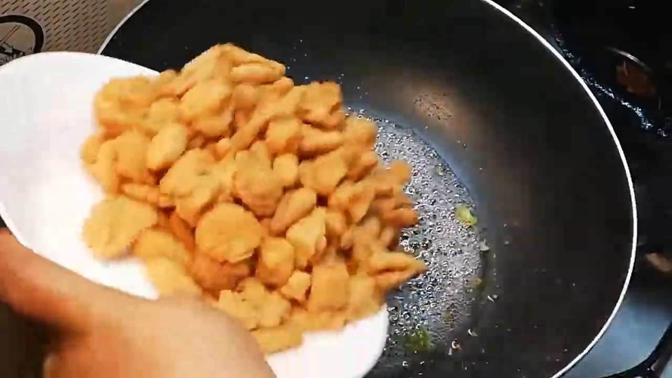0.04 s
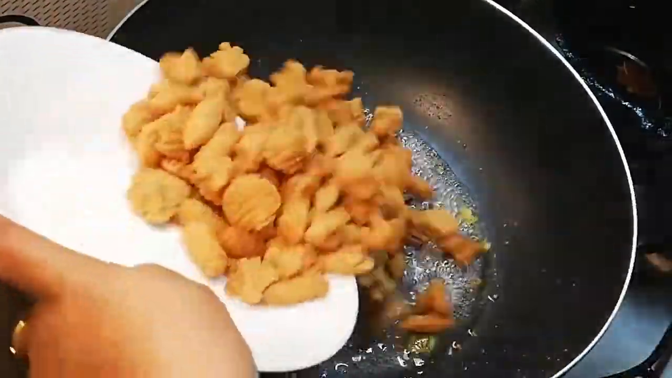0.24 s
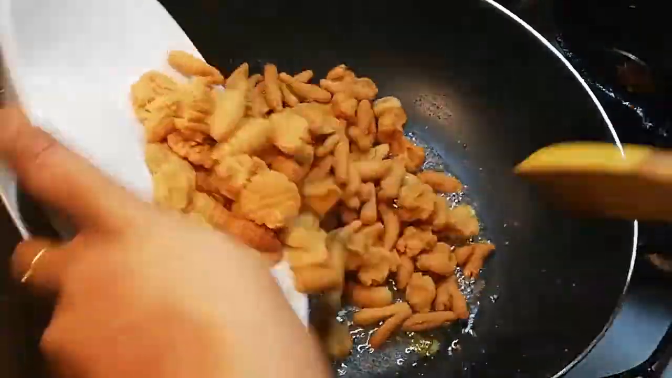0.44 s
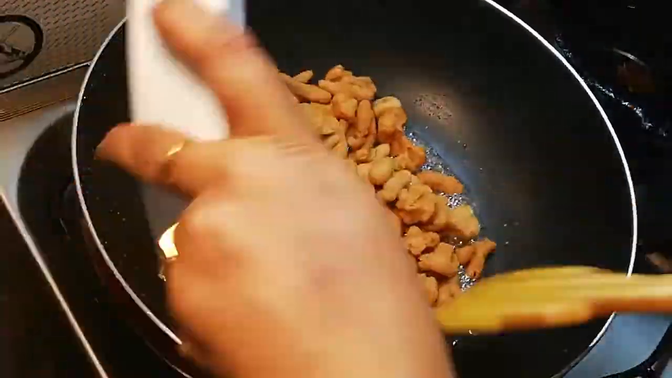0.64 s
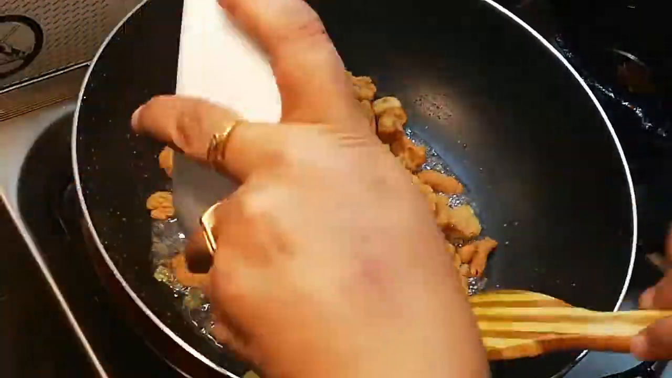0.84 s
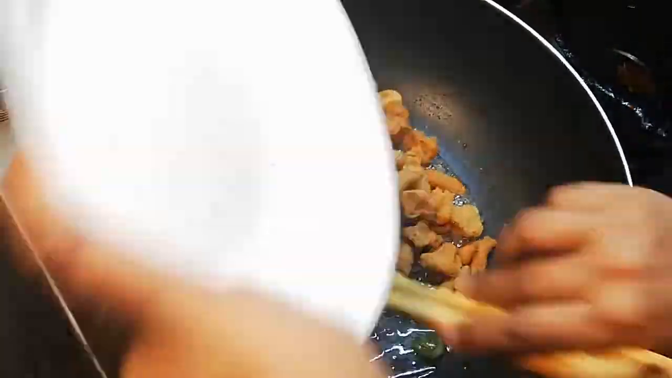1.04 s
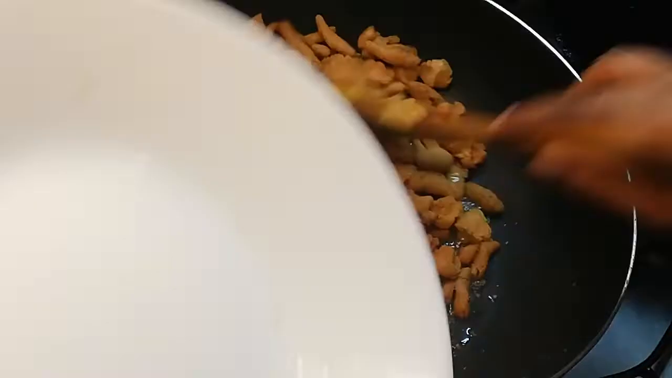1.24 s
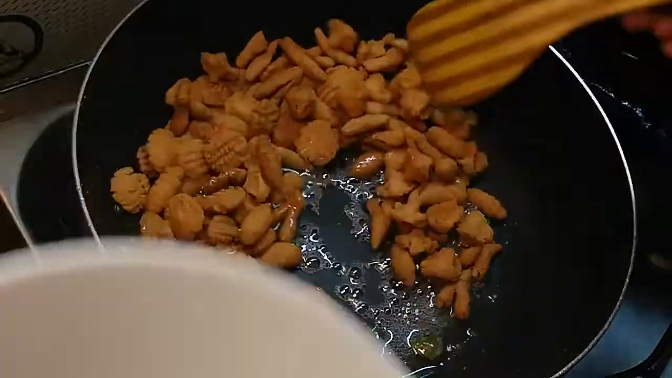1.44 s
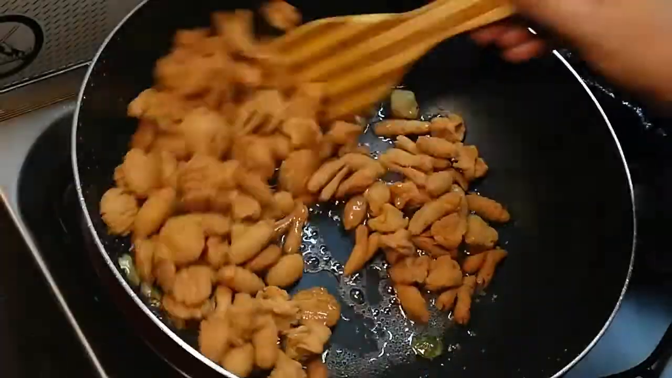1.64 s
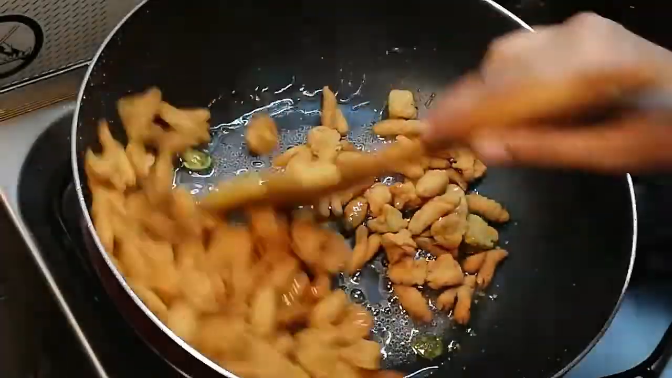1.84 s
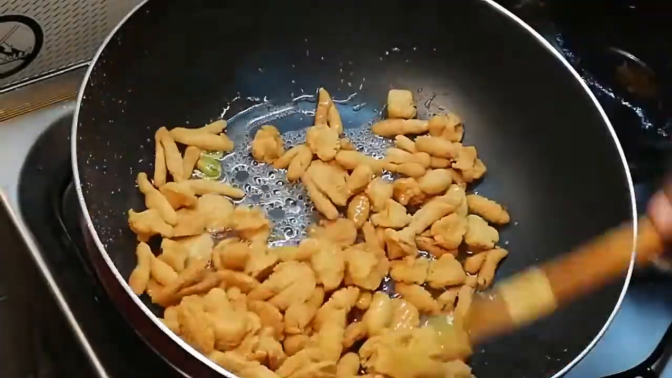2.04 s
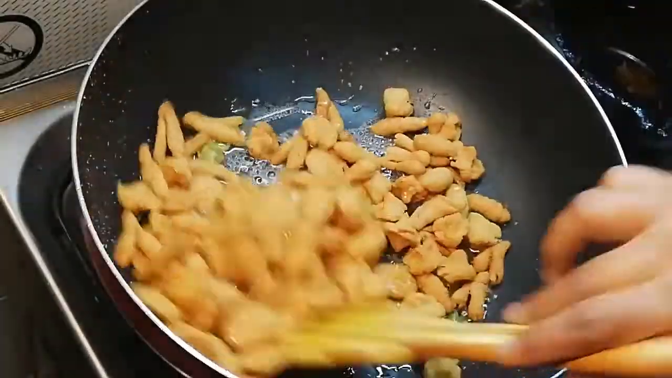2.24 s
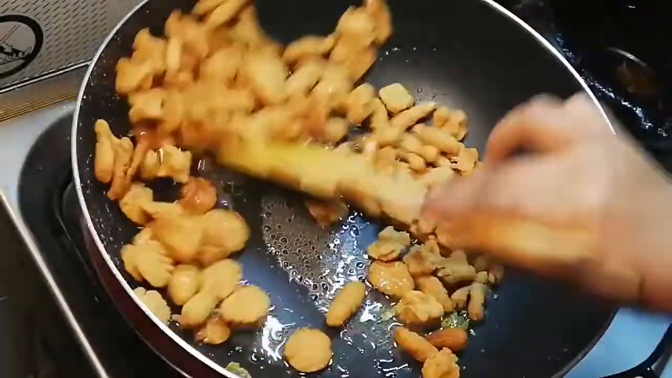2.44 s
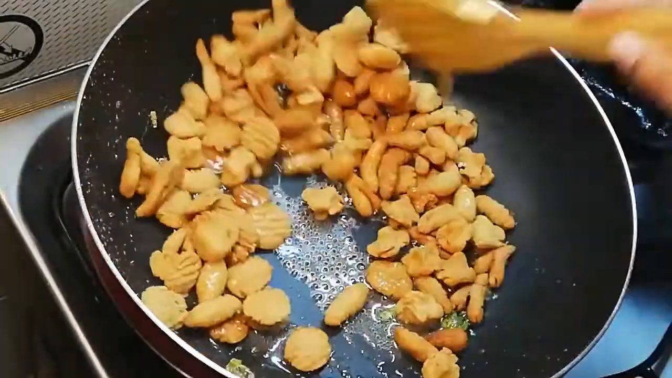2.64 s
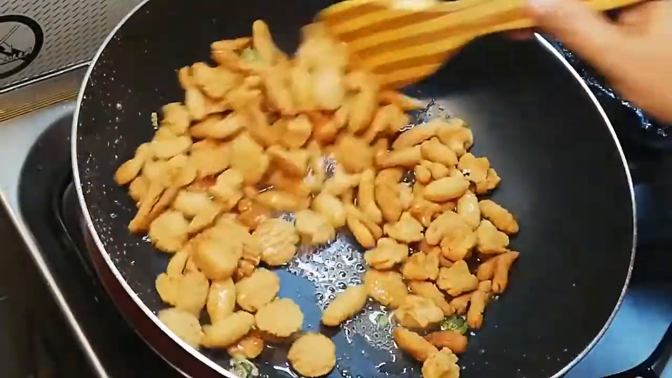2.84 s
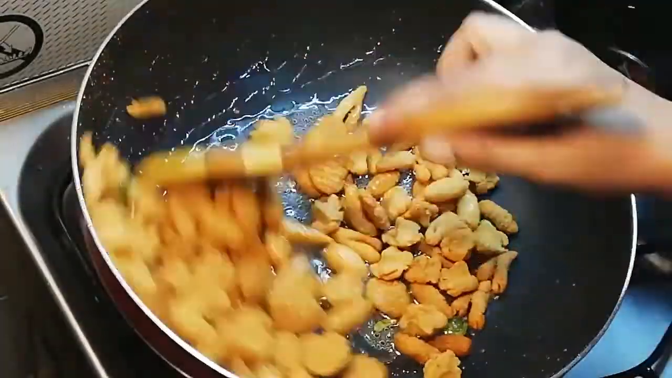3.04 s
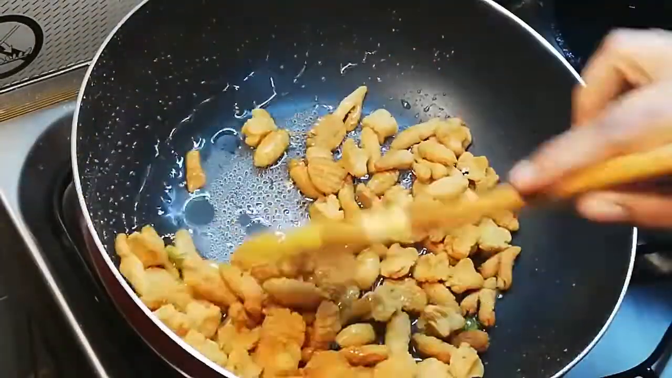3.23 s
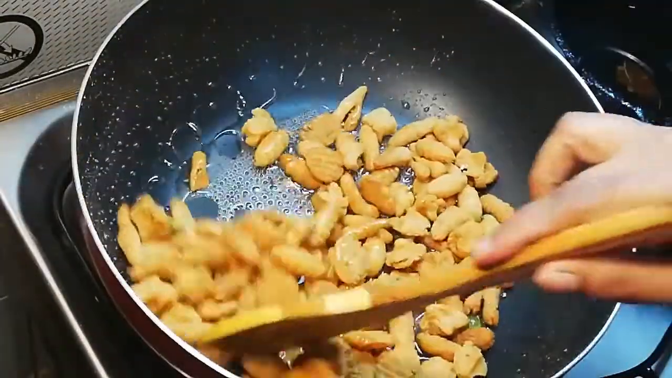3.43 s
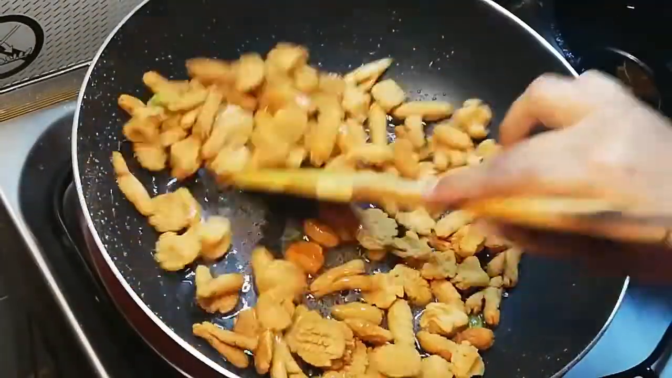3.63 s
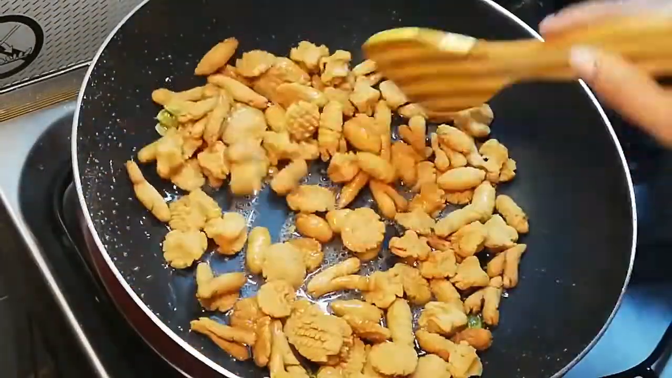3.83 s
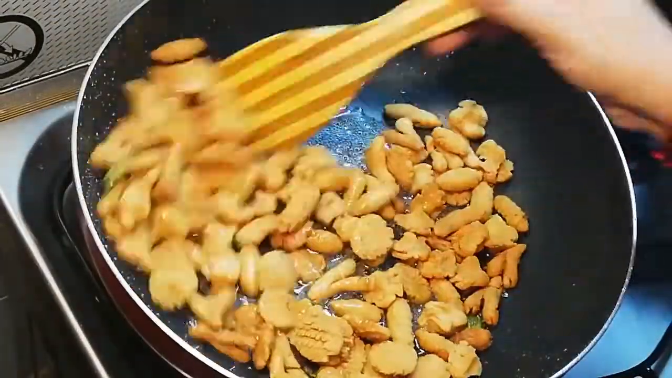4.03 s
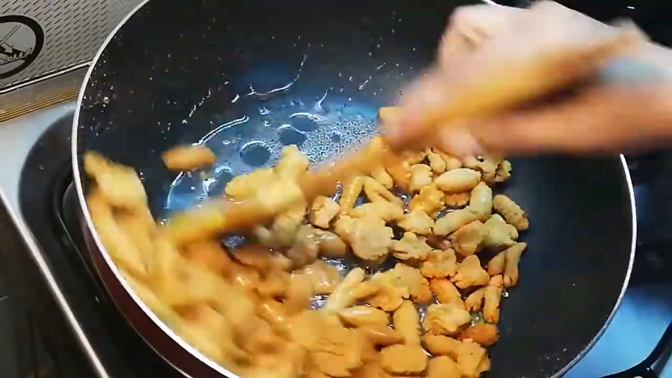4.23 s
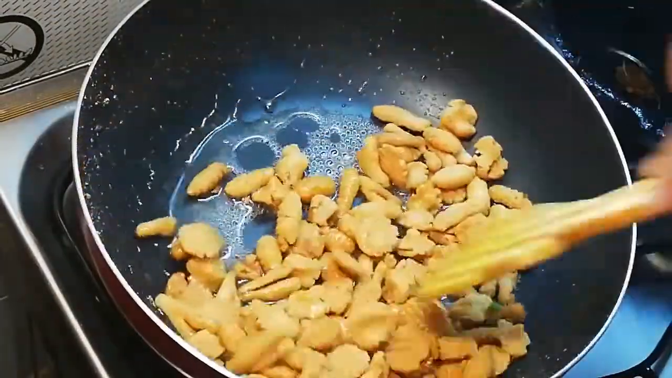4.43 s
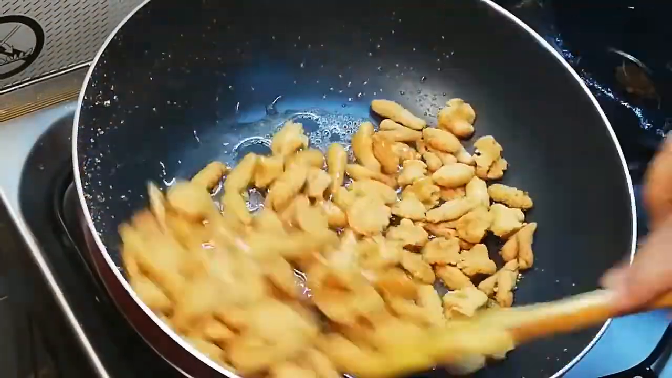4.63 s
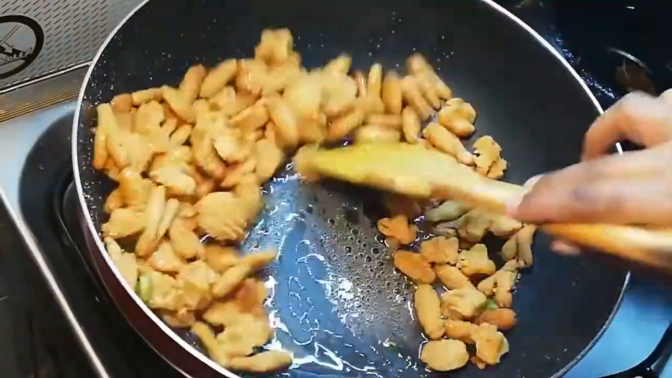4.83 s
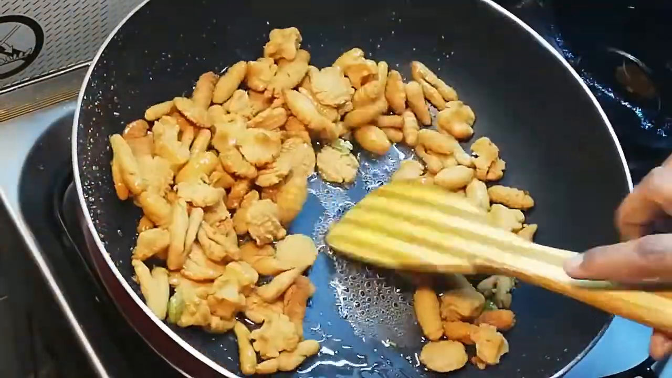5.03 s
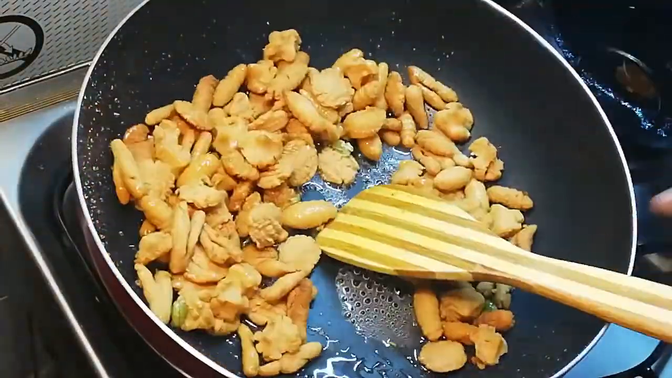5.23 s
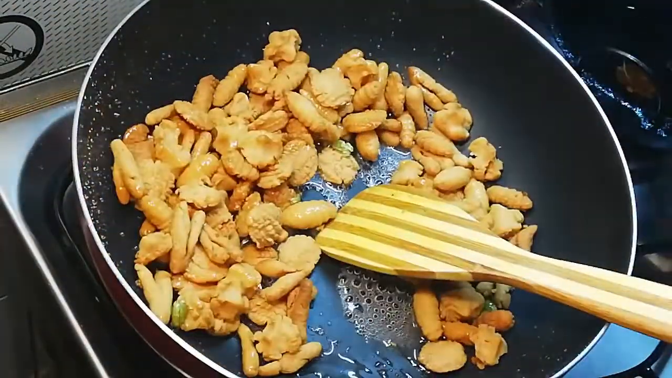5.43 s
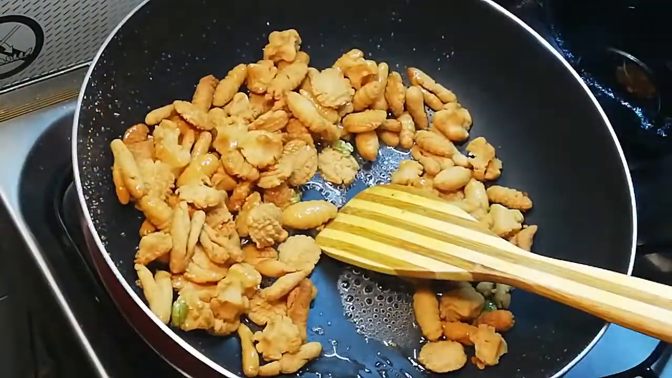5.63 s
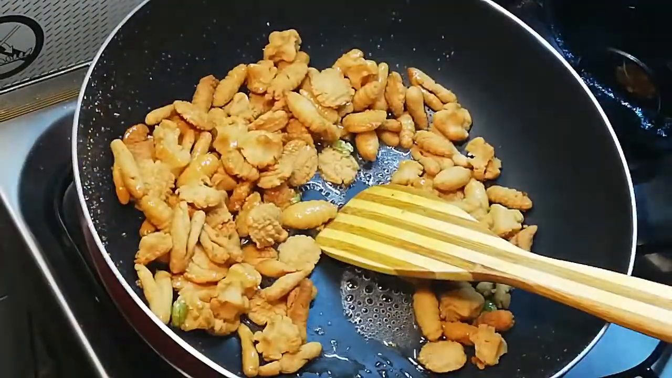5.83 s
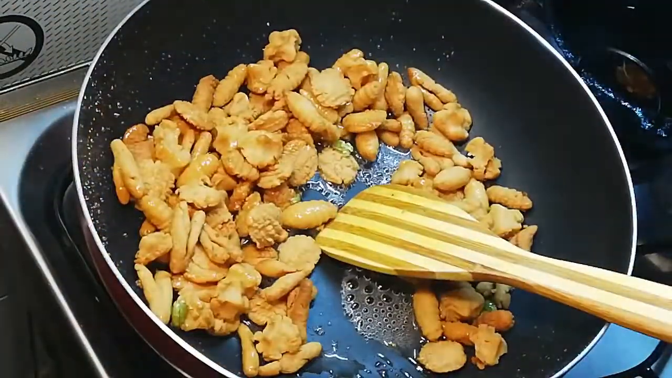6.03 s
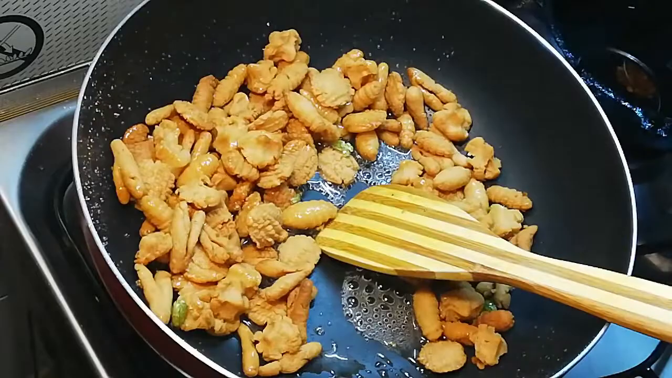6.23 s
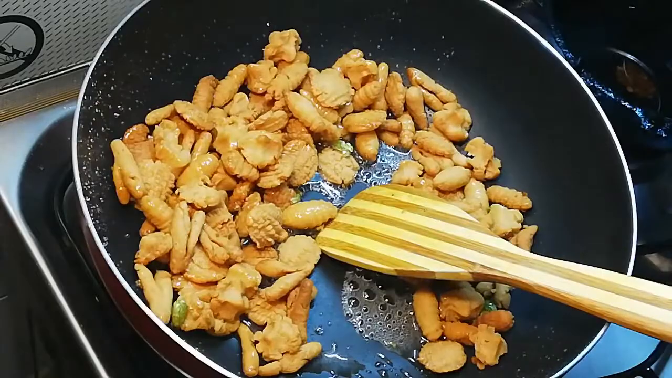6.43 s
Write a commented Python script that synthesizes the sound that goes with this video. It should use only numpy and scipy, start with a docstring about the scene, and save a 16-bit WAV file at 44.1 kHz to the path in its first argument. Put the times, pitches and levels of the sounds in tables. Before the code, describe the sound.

From 0 s a heap of crisp fried pieces slides off a plate into a pan: dense hard patter, separate clacks ringing the metal and crunchy rustle, strongest until about 0.4 s, with a tiny high squeak near 0.45 s. It thins by 0.8 s. From 0.86 s to about 4.7 s a wooden spatula turns the pieces in nine uneven strokes, roughly at 0.9, 1.4, 1.7, 2.1, 2.7, 2.9, 3.3, 3.8 and 4.5 s, each a swelling scrape of rustle and patter, with low pan rocking. Knocks stand out at 1.55, 2.4, 3.27 and 3.5 s. Spatula taps come at 4.5 and 4.97 s, with softer ones as it is laid down by 5.2 s. Then only faint fizz, low kitchen rumble and hiss remain, with dull plate contacts at 6.07 and 6.24 s. Close stereo, small hard room, right side darker.

```python
"""Crisp fried pieces slide off a plate into a pan of simmering syrup and are turned with a wooden spatula.
Showers of short damped grains make the patter on the pan and the rustle of crust on crust.
Filtered contact pulses ring the modes of pan, spatula and plate: knocks, taps, and the plate put down.
Shaped noise rocks the pan on its support and fills the kitchen; wavering tones squeak, and syrup fizzes faintly.
The kitchen is small and hard, with the right microphone turned away from the stove."""
import sys
import numpy as np
from scipy import signal
from scipy.fft import rfft, irfft
from scipy.io import wavfile
from scipy.ndimage import uniform_filter1d

SR = 44100
rng = np.random.default_rng(int(sys.argv[2]) if len(sys.argv) > 2 else 0)


def bounce(signal):
    """Save signal as a 16-bit WAV file at the path given by the first command-line argument."""
    frames = np.transpose(np.atleast_2d(signal))
    limited = np.clip(frames, -1, 1)
    pcm = np.round(limited * 32767).astype(np.int16)
    wavfile.write(sys.argv[1], SR, pcm)


N = 286673

# resonances of the pan on its support: frequency_hz, level_db, t60_s
SUPPORT_MODES = [(123.7, -0.5, 0.3), (172.3, -5.5, 0.18), (205.6, 0.5, 0.071), (307, -3.5, 0.03),
                 (415, -5.5, 0.08)]
# resonances of the loaded pan: frequency_hz, level_db, t60_s
PAN_MODES = [(471.4, 5.5, 0.24), (511.8, 11, 0.25), (549, 8.5, 0.033), (854, -3, 1), (1002, 4, 0.31),
             (1038, 7, 0.19), (1133, 12, 0.016), (1210, -20, 0.52), (1307, -3.5, 0.14), (1482, 0, 0.29),
             (1507, -3, 0.17), (1653, -4, 0.33), (1620, -2, 0.082), (1864, 0, 0.25), (2170, -7.5, 0.11),
             (2170, -32, 0.089), (2473, 3, 0.058), (2585, 6.5, 0.12), (3658, 14.5, 0.033),
             (4180, -21, 0.094)]
# spectrum of crust on crust: frequency_hz, level_db (per hertz)
RUSTLE_SPECTRUM = [(300, -65), (1500, 8), (3000, -0.5), (5000, 2), (7000, -3), (9200, -2.5), (11500, -4.5),
                   (16000, 2)]
# spatula strokes; the blade gathers pieces to a full load, pushes them on, then lifts; levels are relative:
# start_s, gather_s, push_s, patter_db, rustle_db, patter_entry_db, rustle_entry_db, rock_db
# (entry levels are relative to full load)
SPATULA_STROKES = [ (0.856, .2, .11, -34, -48, -4, -2, -63), (1.423, 0.043, 0.11, -40, -39.5, -2, -3, -43),
                   (1.660, 0.078, 0.084, -38, -43.5, -10, -7, -74),
                   (2.075, 0.24, 0.099, -33.5, -41.5, -7, -3, -52),
                   (2.699, 0.031, 0.14, -38.5, -44, 9, -10, -47.5),
                   (2.879, 0.14, 0.018, -39, -41.5, -10, -5, -76),
                   (3.260, 0.24, 0.057, -33, -44, -25.5, -5.5, -58),
                   (3.833, 0.15, 0.32, -39.5, -42, -7.5, -10, -45.5),
                   (4.51, 0.22, 0.014, -34.5, -36, -16, -12.5, -49)]
# once left alone, the crusts stop rubbing sooner than loose pieces stop rolling
PATTER_SETTLE_DB_PER_S, RUSTLE_SETTLE_DB_PER_S = 80, 117


def amp(db):
    """Level law: converts decibels to amplitude gain."""
    return 10 ** (np.asarray(db) / 20)


def unit(x):
    """Power normalization: scales to rms 1."""
    return x / np.sqrt(np.mean(x ** 2) + 1e-20)


def unit_energy(x):
    """Energy normalization: scales to a summed square of 1."""
    return x / np.sqrt(np.sum(x ** 2) + 1e-20)


def at_hz(points, hz):
    """Logarithmic frequency scale: interpolates a spectrum table along it."""
    table_hz, value = np.transpose(points)
    return np.interp(np.log(hz + 1), np.log(table_hz), value)


def add(mix, s, sound):
    """Superposition: mixes a sound in at time s."""
    part = mix[..., max(round(s * SR), 0):][..., :sound.shape[-1]]
    part += sound[..., :part.shape[-1]]


def convolve(x, response):
    """Linear time-invariant response: convolves along time and keeps the length."""
    return signal.fftconvolve(np.atleast_2d(x), np.atleast_2d(response), axes=1)[:, :x.shape[-1]]


def causal(db_of_hz, size=2048):
    """Minimum phase: the most compact impulse response with a given spectrum."""
    hz = abs(np.fft.fftfreq(size, 1 / SR))
    log_gain = np.log(amp(np.maximum(db_of_hz(hz), -100)))
    # the Hilbert transform of the log gain gives the phase
    return np.fft.ifft(np.exp(np.conj(signal.hilbert(log_gain)))).real


def colour(x, points):
    """Spectral shaping: filters by a spectrum table."""
    return convolve(x, causal(lambda hz: at_hz(points, hz)))[0]


def modes(table, size=12000):
    """Modal superposition: the free ring of a body is a sum of decaying sines."""
    t = np.arange(size) / SR
    ring = np.zeros(size)
    for k, (hz, db, t60) in enumerate(table):
        sign = (-1) ** k
        ring += sign * amp(db - 60 * t / t60) * np.sin(2 * np.pi * hz * t)
    # little is radiated below the lowest mode
    lowest_hz = table[0][0]
    return signal.sosfilt(signal.butter(2, .75 * lowest_hz, "high", fs=SR, output="sos"), ring)


def pair(x):
    """Spatial coherence: makes two unrelated channels alike in the bass, as at two close microphones."""
    # likeness of reflected sound at the two microphones: frequency_hz, likeness (0 to 1)
    likeness = [(130, 0.97), (290, 0.8), (500, 0), (900, 0.04)]
    z = rfft(x)
    same = np.clip(at_hz(likeness, np.fft.rfftfreq(x.shape[1], 1 / SR)), 0, 1)
    right = same * z[0] + np.sqrt(1 - same ** 2) * z[1]
    return irfft(np.array([z[0], right]), x.shape[1])


def paths(room_db, near_db=-4, near_s=0.0042, size=24000):
    """Multipath propagation from pan to microphones: direct sound, bounces off pan wall and hob, the room."""
    # reverberation: frequency_hz, t60_s
    room_decay = [(130, 0.62), (400, 0.76), (1000, 0.56), (2800, 0.47), (7300, 0.31), (15000, 0.24)]
    t = np.arange(size) / SR
    direct = np.zeros((2, size))
    direct[0, 10] = direct[1, rng.integers(0, 18)] = 1  # a random small lag between the microphones
    near = rng.standard_normal((2, size)) * (rng.random((2, size)) < .06)
    near *= np.exp(-t / near_s) * (t > .0006)
    echoes = rng.choice([-1., 1.], (2, size)) * (rng.random((2, size)) < .08) * (t > .006)
    # each frequency of the sparse echoes decays at its own rate
    hz, s, z = signal.stft(echoes, SR, nperseg=256)
    decay = amp(-60 * s / at_hz(room_decay, hz)[:, None])
    tail = signal.istft(z * decay, SR, nperseg=256)[1][:, :size]
    reflected = amp(near_db) * unit_energy(near) + amp(room_db) * unit_energy(tail)
    return direct + np.sqrt(2) * pair(reflected)


def grains(per_s, spread_db, low_hz, high_hz, cycles, spectrum, room_db, steady_s, count=6, size=600):
    """Poisson-like shower of small impacts, each a few cycles at one of many pitches, over several pan spots."""
    t, out = np.arange(size) / SR, np.zeros((2, N))
    for spot in range(count):
        clicks = np.zeros(N)
        for hz in np.geomspace(low_hz, high_hz, count) * rng.uniform(.8, 1.2, count):
            chance, strength, sign = rng.random((3, N))
            hit = np.flatnonzero(chance < per_s / count ** 2 / SR)
            level_db = spread_db * np.minimum(-np.log(strength[hit]), 4)  # few are strong
            train = np.zeros(N)
            train[hit] = np.sign(sign[hit] - .5) * amp(level_db)
            grain = np.exp(-t * hz / cycles) * np.cos(2 * np.pi * hz * t)
            clicks += signal.oaconvolve(train, unit_energy(grain) * np.sqrt(hz))[:N]
        out += convolve(colour(clicks, spectrum), paths(room_db))
    # the slow level is evened out, to be set later; single impacts stand out from it
    power = uniform_filter1d((out ** 2).mean(0), int(steady_s * SR) + 1)
    return out / np.sqrt(abs(power) + .01 * power.mean())


def blow(struck, hz, octaves, thud_db, ring_db, contact_s, room_db, skirt_db=15, chatter=0.7, size=24000):
    """Impact excitation: a short grating push gives a dry clack, rings the struck body and thumps the support."""
    t = np.arange(size) / SR
    push = chatter * rng.standard_normal(size) * 2 * t / contact_s * np.exp(-(t / contact_s) ** 2)
    push[0] += 2
    # soft wood gives a low clack, a hard edge a high one
    hump = causal(lambda f: -skirt_db * (np.hypot(1, np.log2((f + 20) / hz) / octaves) - 1))
    clack = unit_energy(convolve(push, hump))
    body = unit_energy(convolve(modes(struck, size), hump))
    thud = unit_energy(modes(SUPPORT_MODES, size))
    return convolve(clack + amp(ring_db) * body + amp(thud_db) * thud, paths(room_db))


def pour(axis):
    """Gravity-driven slide: one dB column of the pour as gain; it dies away when the plate is empty."""
    # the pile sliding off the plate, relative levels: time_s, patter_db (on the pan), rustle_db (crust on crust)
    slide = np.array([(0, -30, -33.5), (.16, -24, -30), (.21, -26, -35), (.36, -28.5, -37.5),
                      (0.481, -40.5, -44), (.61, -33, -41), (.71, -37, -39), (.83, -45.5, -51.5)])
    t = np.arange(N) / SR
    level_db = np.interp(t, slide[:, 0], slide[:, axis])
    return amp(level_db - PATTER_SETTLE_DB_PER_S * np.maximum(t - slide[-1, 0], 0))


def stroke(gather_s, push_s, entry_db, settle_db_per_s):
    """Load-dependent excitation: goes from entry to full load, sags a little in the push, then settles."""
    entry_s, push_sag_db_per_s = 0.018, 5
    t = np.arange(N) / SR
    swell = entry_db * np.maximum(1 - t / gather_s, 0)
    sag = push_sag_db_per_s * np.clip(t - gather_s, 0, push_s)
    settle = settle_db_per_s * np.maximum(t - gather_s - push_s, 0)
    return np.minimum(t / entry_s, 1) * amp(swell - sag - settle)


def motion():
    """Power addition: patter and rustle gains from the pour and stroke after stroke."""
    fall_s = 0.022  # pieces pushed off the blade keep landing for this long after it lifts
    patter, rustle = pour(axis=1) ** 2, pour(axis=2) ** 2
    for s, gather_s, push_s, patter_db, rustle_db, patter_entry_db, rustle_entry_db, _ in SPATULA_STROKES:
        pattering = stroke(gather_s, push_s + fall_s, patter_entry_db, PATTER_SETTLE_DB_PER_S)
        rustling = stroke(gather_s, push_s, rustle_entry_db, RUSTLE_SETTLE_DB_PER_S)
        add(patter, s, (amp(patter_db) * pattering) ** 2)
        add(rustle, s, (amp(rustle_db) * rustling) ** 2)
    return np.sqrt(patter), np.sqrt(rustle)


def clacks(per_s=34, spread_db=10, low_hz=1300, high_hz=3600, count=6):
    """Random impact process: whole pieces of several sizes tumble over and strike the pan."""
    out = np.zeros((2, N))
    for hz in np.geomspace(low_hz, high_hz, count):
        chance, strength = rng.random((2, N))
        train = (chance < per_s / count / SR) * amp(-spread_db * strength)
        clack = blow(PAN_MODES, hz, octaves=1.08, thud_db=-22, ring_db=-9, contact_s=0.0016, room_db=-4)
        out += convolve(train, clack)
    return out


def heap(clump_db=1.5, clump_s=0.0089, ring_db=-13, clack_db=-5.0):
    """Granular collision and friction: pieces patter and clack, crusts rub; they give way in small clumps."""
    # patter on the pan: frequency_hz, level_db (per hertz)
    patter_spectrum = [(100, -3), (340, -8.5), (500, -11), (660, -7.5), (1020, -0.5), (1280, -1.5),
                       (1550, 0), (2200, -10), (3000, -16), (4500, -24), (8000, -24), (16000, -72)]
    patter = grains(per_s=650, spread_db=4.5, low_hz=543, high_hz=3820, cycles=1.56,
                    spectrum=patter_spectrum, room_db=4.0, steady_s=0.16)
    rustle = grains(per_s=1800, spread_db=4.0, low_hz=2186, high_hz=11060, cycles=2.0,
                    spectrum=RUSTLE_SPECTRUM, room_db=4, steady_s=0.0097)
    patter = unit(patter) + amp(clack_db) * unit(clacks())
    patter = patter + amp(ring_db) * convolve(patter, unit_energy(modes(PAN_MODES)))
    clumps = amp(clump_db * unit(uniform_filter1d(rng.standard_normal(N), int(clump_s * SR) + 1)))
    pattering, rustling = motion()
    moving = clumps * (amp(-2.5) * unit(patter) * pattering + amp(3.5) * unit(rustle) * rustling)
    # the room hangs on for a moment after each stroke
    return convolve(moving, paths(room_db=-13.5, near_db=-24))


def settling(db=-12, linger_s=0.11):
    """Stick-slip relaxation: sticky crusts tick crisply for a moment after the heap has been moved."""
    ticks = grains(per_s=150, spread_db=5, low_hz=2520, high_hz=10400, cycles=2.2,
                   spectrum=RUSTLE_SPECTRUM, room_db=-8, steady_s=0.1)
    # unrest follows the rustle's power and decays exponentially
    rate = 1 / (linger_s * SR)
    rustling = motion()[1]
    unrest = signal.lfilter([rate], [1, rate - 1], rustling ** 2)
    return amp(db) * unit(ticks) * np.sqrt(unrest)


def rocking():
    """Forced resonance: falling pile, tipping at each stroke and dragging blade shake the pan on its support."""
    pour_shake_db = -27.5  # relative to the patter of the pour
    drag_shake_db = -55  # relative level for as long as the blade drags
    # the pan tips as the blade bears down, then steadies
    rise_s, hold_s, fade_db_per_s = 0.035, 0.048, 56
    t, power = np.arange(N) / SR, (amp(pour_shake_db) * pour(axis=1)) ** 2
    tip = np.minimum(t / rise_s, 1) * amp(-fade_db_per_s * np.maximum(t - rise_s - hold_s, 0))
    for s, gather_s, push_s, *_, rock_db in SPATULA_STROKES:
        drag = stroke(gather_s, push_s, entry_db=0.5, settle_db_per_s=43)
        add(power, s, (amp(rock_db) * tip) ** 2 + (amp(drag_shake_db) * drag) ** 2)
    shake = pair(convolve(rng.standard_normal((2, N)), modes(SUPPORT_MODES)))
    return amp(1) * unit(shake) * np.sqrt(power)  # 1 dB above the relative levels


def simmer():
    """Random bubble bursts in the syrup over shaped noise, the steady rumble and hiss of the kitchen."""
    # bursting bubbles: frequency_hz, level_db (per hertz)
    fizz_spectrum = [(300, -33), (1000, -3.5), (2200, -12), (4000, -7), (9000, -33), (16000, -24)]
    # kitchen rumble and hiss: frequency_hz, level_db (per hertz)
    kitchen_spectrum = [(15, -4), (30, -4), (48, 7), (80, -1), (180, -4), (230, -10.5), (330, -16.5),
                        (1500, -17.5), (2000, -14.5), (2700, -16.5), (4400, -19), (8800, -26),
                        (15000, -29.5)]
    fizz = grains(per_s=1100, spread_db=2, low_hz=1114, high_hz=9400, cycles=1.4,
                  spectrum=fizz_spectrum, room_db=3, steady_s=.3)
    air = pair(np.array([colour(side, kitchen_spectrum) for side in rng.standard_normal((2, N))]))
    return amp(-69.5) * fizz + amp(-56.5) * unit(air)


def drops():
    """Impact of single pieces: those that land hard on the pan ring its modes."""
    # hard landings: time_s, level_db, centre_hz
    landings = [(.0025, 6.5, 1230), (.009, 2.5, 1650), (0.018, 1, 2800), (.097, -.5, 1300), (.114, 3, 1640),
                (.130, 0.5, 2130), (0.189, -1, 4560), (.233, -5, 1390), (0.263, -3, 1080), (.333, -2, 2220),
                (.388, -8, 8000), (1.261, -18.5, 7000), (1.3067, -14, 2700), (1.396, -17, 6000),
                (1.48, -10.5, 2250), (2.174, -9, 1840), (2.612, -16.5, 9400), (2.685, -20.5, 5500),
                (3.661, -14.5, 1200), (4.776, -7, 2500)]
    out = np.zeros((2, N))
    for s, db, hz in landings:
        landing = blow(PAN_MODES, hz, octaves=1.0, thud_db=-43.5, ring_db=-10, contact_s=0.0013, room_db=-4)
        add(out, s, amp(db) * landing)
    return out


def squeaks(waver=0.008):
    """Stick-slip friction: the pile squeaks over the plate's glaze in brief tones of unsteady pitch."""
    # squeaks: start_s, length_s, pitch_hz, level_db
    slips = [(0.424, 0.048, 3860, -41), (0.473, 0.025, 3820, -34)]
    out = np.zeros(N)
    for s, length_s, hz, db in slips:
        size = int(length_s * SR)
        drift = unit(uniform_filter1d(rng.standard_normal(SR), size=60))[:size]
        phase = 2 * np.pi * np.cumsum(hz * (1 + waver * drift)) / SR
        add(out, s, amp(db) * np.hanning(size) * np.sin(phase))
    return convolve(out, paths(room_db=-7, near_db=-12))


def knocks():
    """Contact stiffness sets the colour: the blade meets the pan, dull with its face and bright with its edge."""
    # blade on pan: time_s, level_db, centre_hz, width_octaves, thud_db, contact_s
    blade_hits = [ (0.772, -18, 250, 0.72, 1.5, 0.0031), (0.8576, -9, 1340, 0.77, -39, 0.0035),
                  (1.428, -9.5, 2870, 1.2, -10, 0.0014), (1.548, 5.5, 1020, 0.64, -18, 0.00061),
                  (2.074, -10.5, 2500, 0.93, -13, 0.0023), (2.426, -5, 1640, 0.63, -34, 0.00079),
                  (2.701, -10, 1900, 0.92, -9, 0.0017), (3.2477, -12.5, 1630, 1.33, -24, 0.0019),
                  (3.261, -6.5, 2500, 0.31, -30, 0.0012), (3.263, -3.5, 6400, 1.6, -23, 0.0022),
                  (3.273, -1.5, 8300, 0.39, -30, 0.0035), (3.457, -5.5, 2000, 0.96, -8, 0.002),
                  (3.489, -0.5, 854, 0.66, -25, 0.0023), (3.833, -13, 450, 2, 3.5, 0.0032),
                  (3.998, -9, 1980, 0.8, -28, .0013)]
    out = np.zeros((2, N))
    for s, db, hz, octaves, thud_db, contact_s in blade_hits:
        knock = blow(PAN_MODES, hz, octaves, thud_db, ring_db=-11, contact_s=contact_s, room_db=-3.5)
        add(out, s, amp(db) * knock)
    return out


def spatula_taps():
    """Modal ring of a struck bar: the spatula is tapped on the pan and laid down."""
    # taps: time_s, level_db, centre_hz, width_octaves, thud_db, ring_db
    tap_hits = [ (4.5105, -5, 4200, 0.96, -13, 4.5), (4.970, -6, 1540, 1.5, -20, 5),
                (5, -27, 2100, 1.1, -36, -6), (5.119, -19, 1900, 2.8, -18, -0.5),
                (5.171, -13.5, 920, 1.26, -3, -7)]
    # resonances of the spatula: frequency_hz, level_db, t60_s
    spatula_modes = [(461, 3, 0.061), (540, 1, 0.064), (836, 2.5, 0.042), (1010, -6.5, 0.052),
                     (1166, 0, 0.07), (1995, -4, 0.025), (2394, -2, 0.034), (3180, -7, 0.034),
                     (3534, 9, 0.023), (5070, 6.5, 0.021), (6700, -30, .02), (8450, -15, .02)]
    out = np.zeros((2, N))
    for s, db, hz, octaves, thud_db, ring_db in tap_hits:
        tap = blow(spatula_modes, hz, octaves, thud_db, ring_db, contact_s=0.0018, room_db=-3.5)
        add(out, s, amp(db) * tap)
    return out


def plate_set_down():
    """Modal ring of a struck plate: the emptied plate is put down beside the stove."""
    # plate contacts: time_s, level_db, centre_hz, width_octaves, thud_db, ring_db
    plate_hits = [ (6.067, -25.5, 1160, .8, -2.5, -26), (6.236, -17, 650, 1.46, -9.5, 3.5)]
    # resonances of the plate: frequency_hz, level_db, t60_s
    plate_modes = [(198, 1.5, 0.13), (291, -3, 0.066), (386, -15, 0.052), (575, -15, 0.078),
                   (844, -7.5, 0.082), (980, 3.5, 0.052), (1240, 2.5, 0.041), (1800, -1, 0.082),
                   (2240, -15, .05), (2920, 4, 0.045), (3170, 19, 0.012), (3840, 13.5, 0.052)]
    out = np.zeros((2, N))
    for s, db, hz, octaves, thud_db, ring_db in plate_hits:
        contact = blow(plate_modes, hz, octaves, thud_db, ring_db, contact_s=0.0032, room_db=4.5)
        add(out, s, amp(db) * contact)
    return out


def scene():
    """Linear superposition of everything at the stove."""
    moved = heap() + settling() + rocking()
    struck = drops() + knocks() + spatula_taps() + plate_set_down()
    return moved + simmer() + squeaks() + struck


def record(dry):
    """Microphone directivity: the right one is shaded in the treble; then a low-pass limits the band."""
    # microphone responses: frequency_hz, level_db
    left_response = [(200, -3), (400, 1), (700, 1.5), (2400, 2), (4400, 0.5), (8000, 4), (15000, -6.5)]
    right_response = [(200, -3), (400, 4), (700, 0), (2400, 3.5), (4400, -2), (8000, -10), (15000, -11.5)]
    heard = np.array([colour(dry[0], left_response), colour(dry[1], right_response)])
    low_pass = signal.firwin(511, 15950, window=("kaiser", 9), fs=SR)  # cutoff in Hz
    return signal.oaconvolve(heard, low_pass[None], "same")


dry = scene()
out = record(dry)
bounce(out)
```